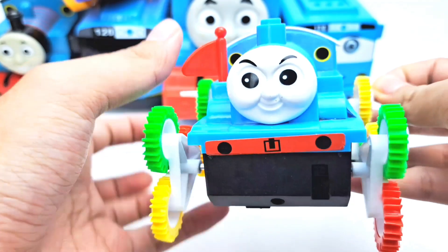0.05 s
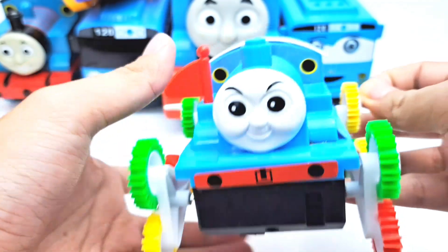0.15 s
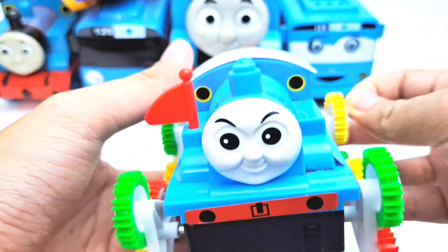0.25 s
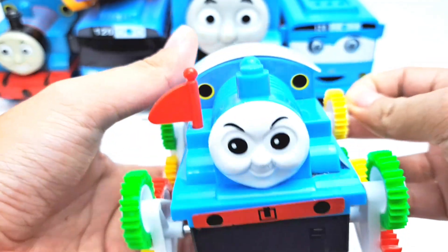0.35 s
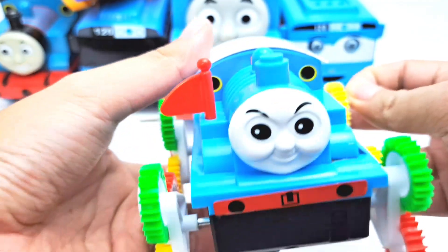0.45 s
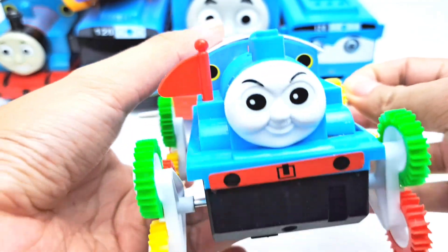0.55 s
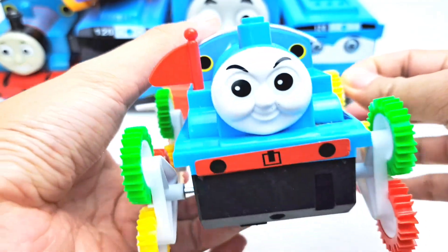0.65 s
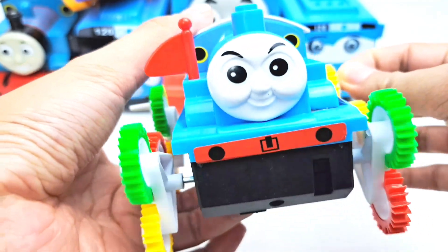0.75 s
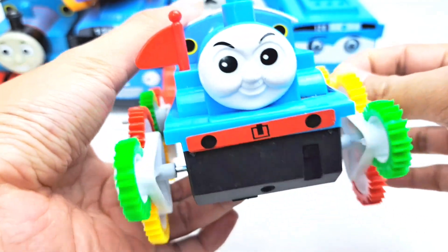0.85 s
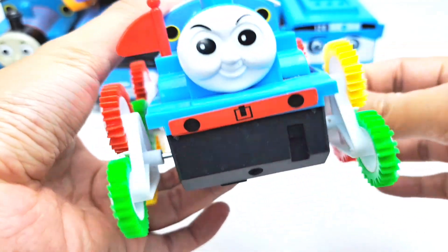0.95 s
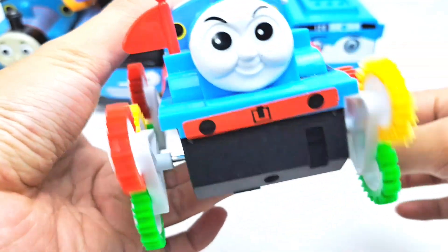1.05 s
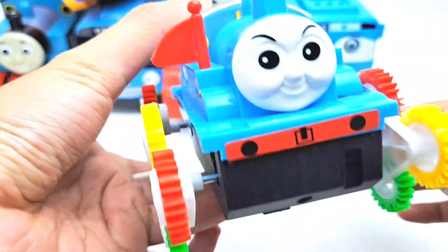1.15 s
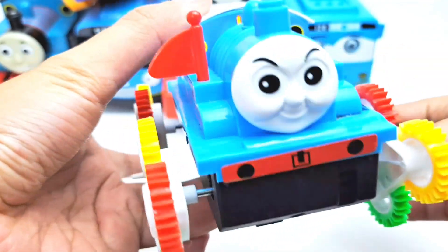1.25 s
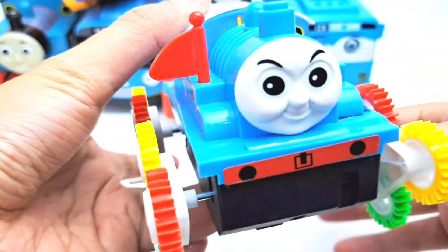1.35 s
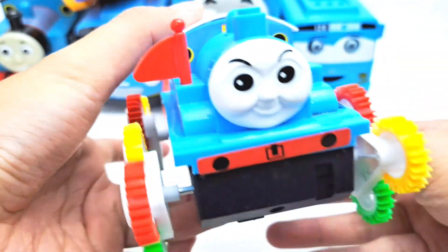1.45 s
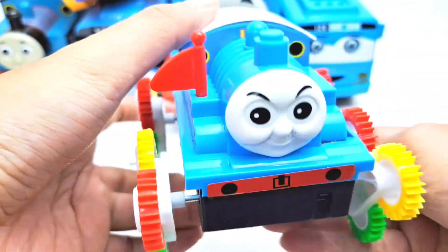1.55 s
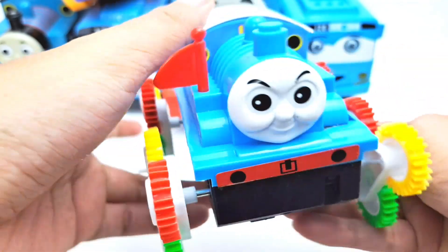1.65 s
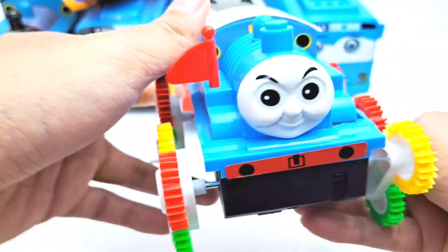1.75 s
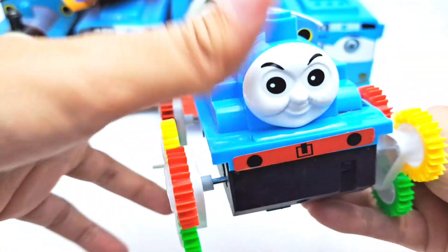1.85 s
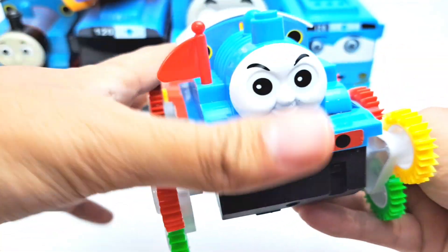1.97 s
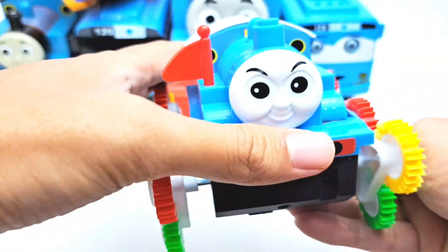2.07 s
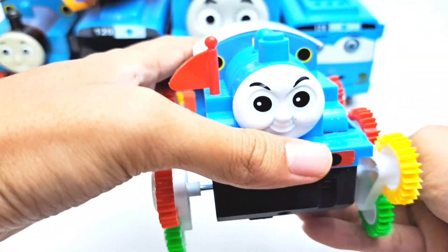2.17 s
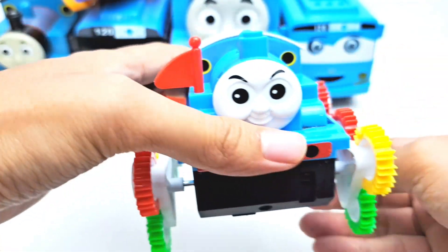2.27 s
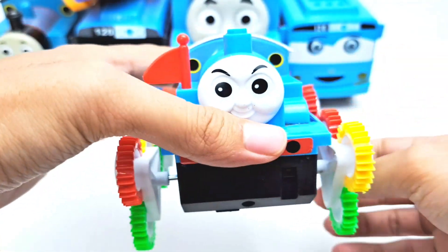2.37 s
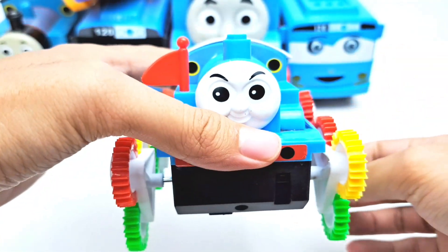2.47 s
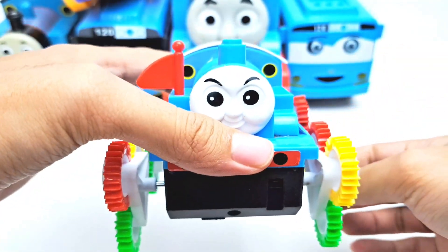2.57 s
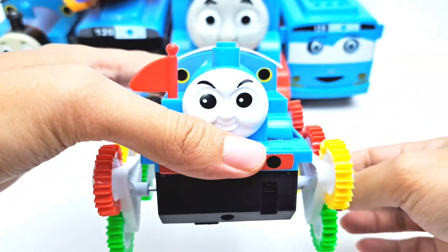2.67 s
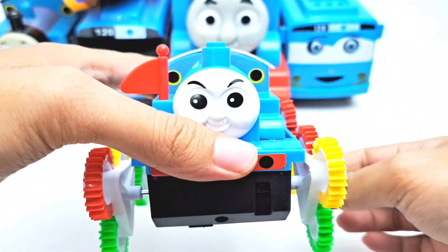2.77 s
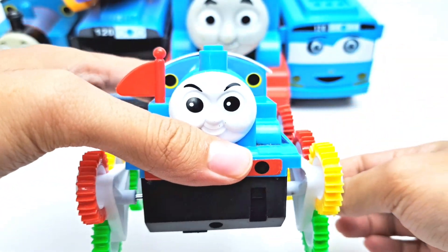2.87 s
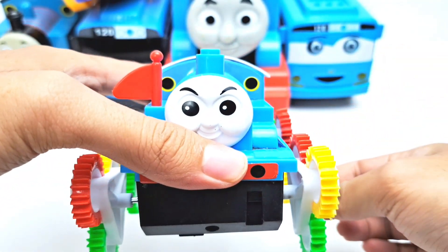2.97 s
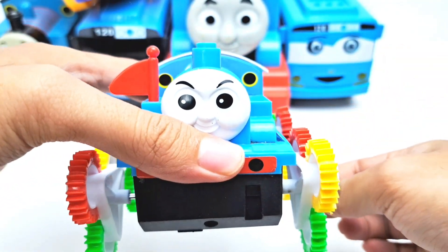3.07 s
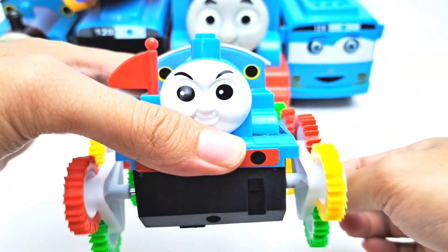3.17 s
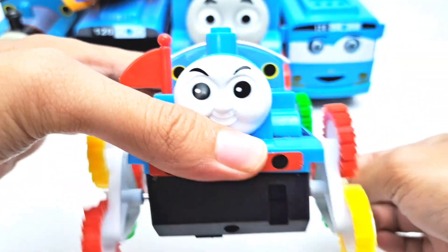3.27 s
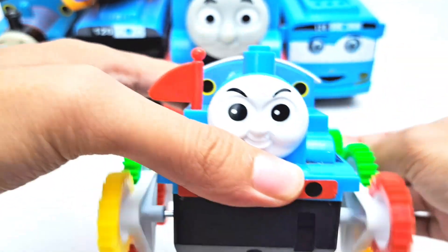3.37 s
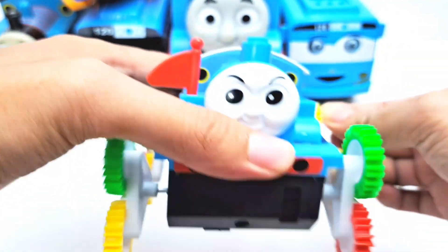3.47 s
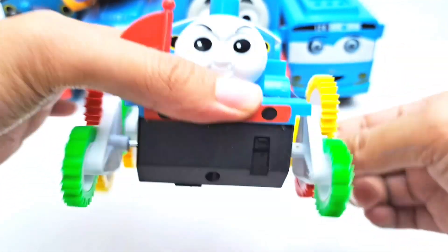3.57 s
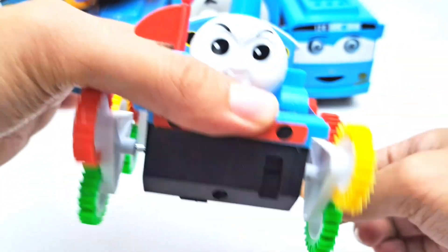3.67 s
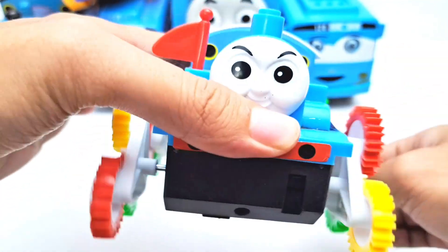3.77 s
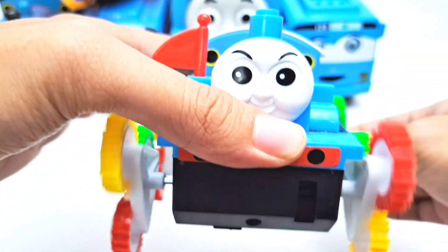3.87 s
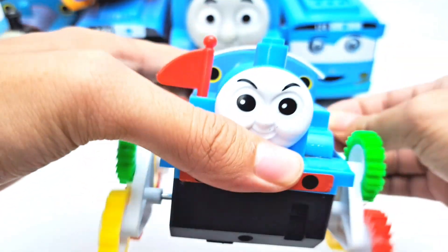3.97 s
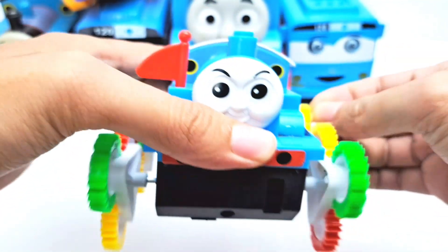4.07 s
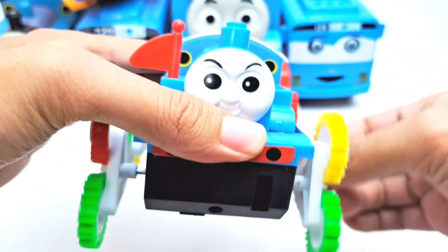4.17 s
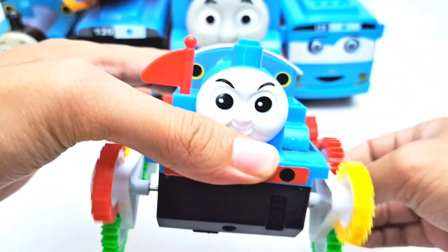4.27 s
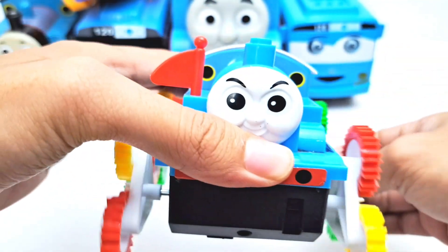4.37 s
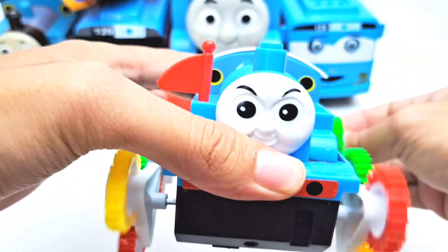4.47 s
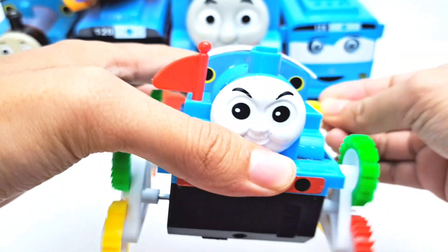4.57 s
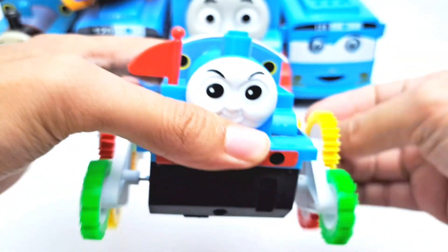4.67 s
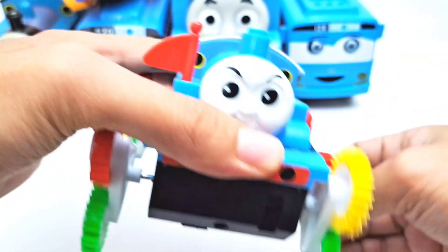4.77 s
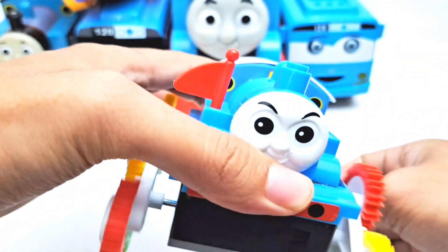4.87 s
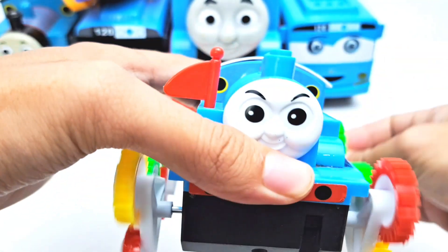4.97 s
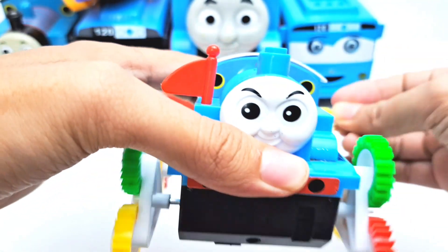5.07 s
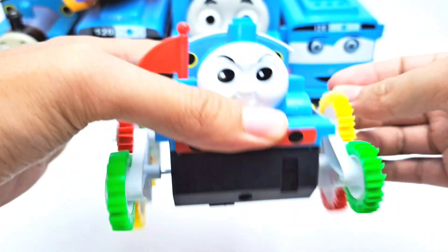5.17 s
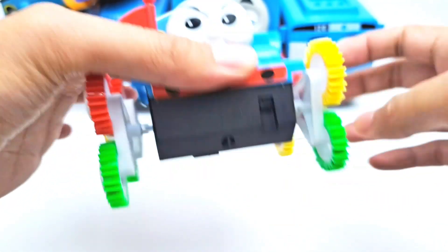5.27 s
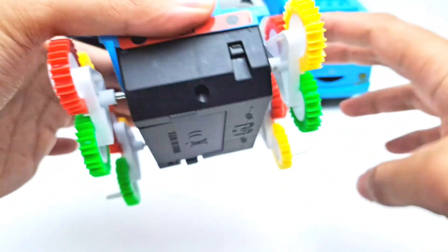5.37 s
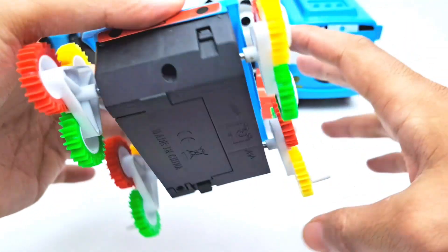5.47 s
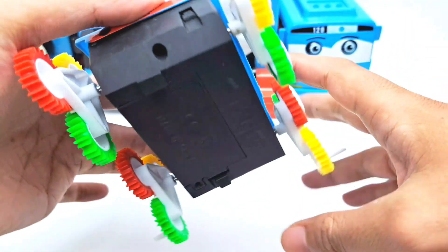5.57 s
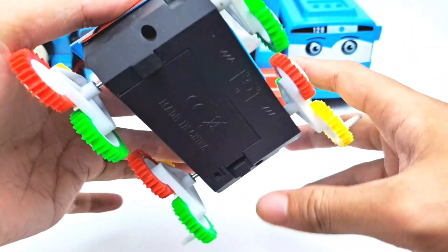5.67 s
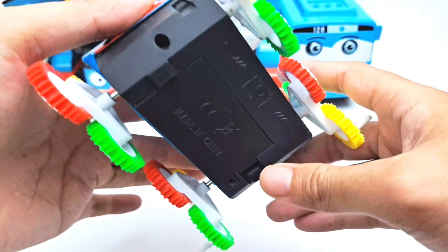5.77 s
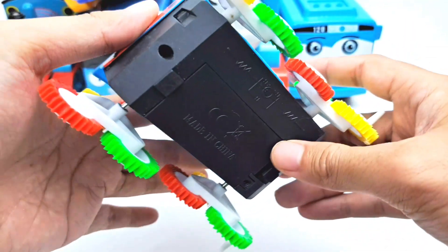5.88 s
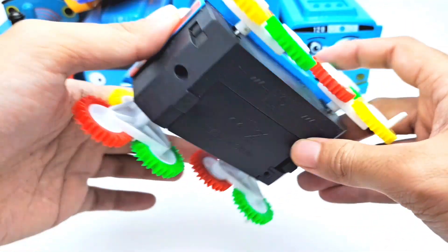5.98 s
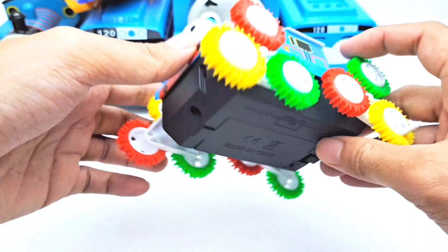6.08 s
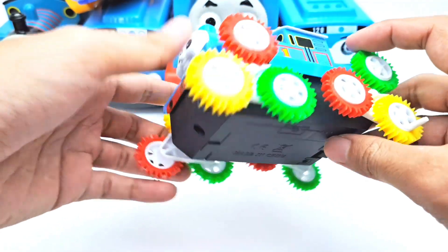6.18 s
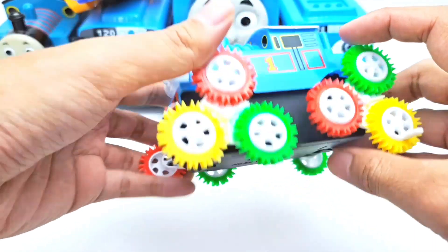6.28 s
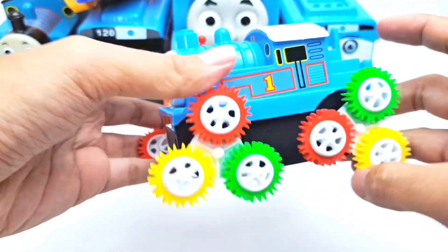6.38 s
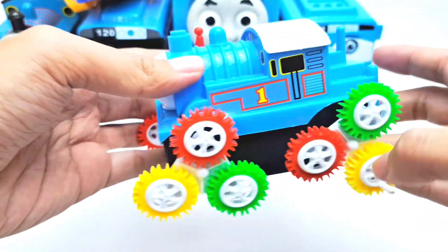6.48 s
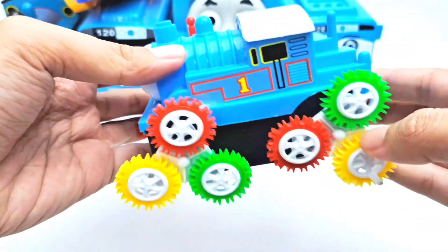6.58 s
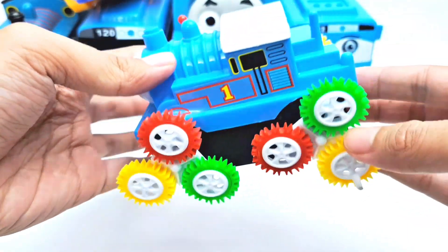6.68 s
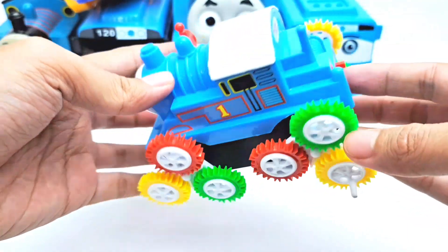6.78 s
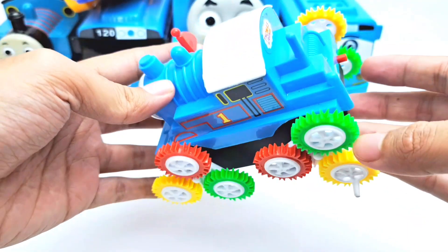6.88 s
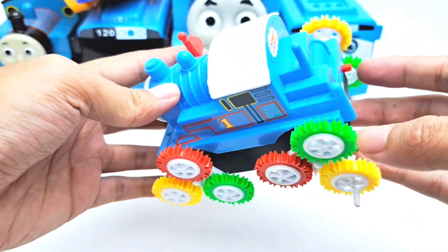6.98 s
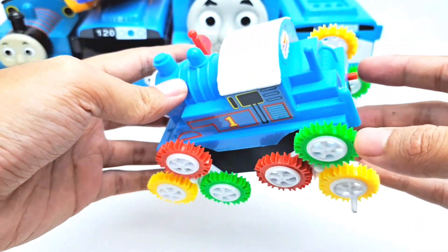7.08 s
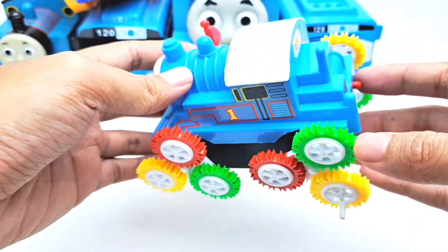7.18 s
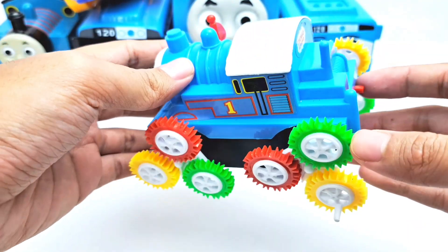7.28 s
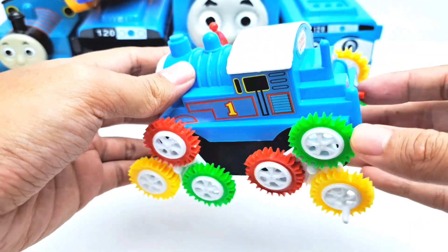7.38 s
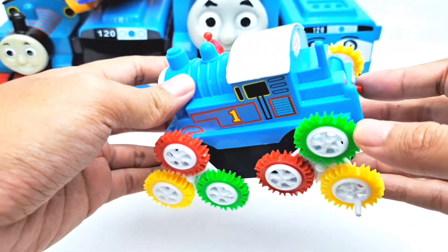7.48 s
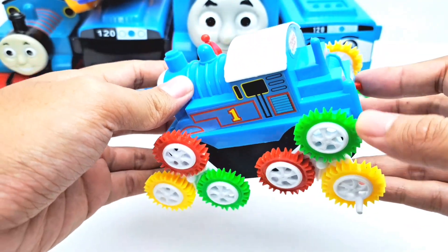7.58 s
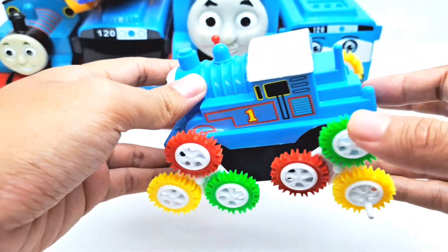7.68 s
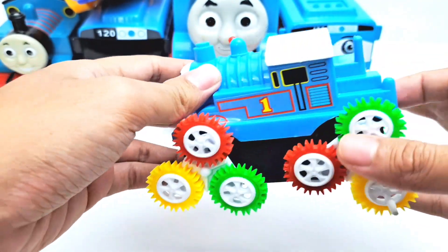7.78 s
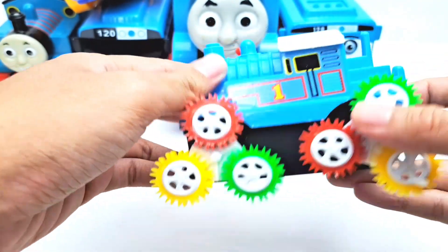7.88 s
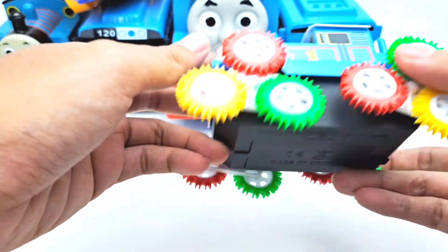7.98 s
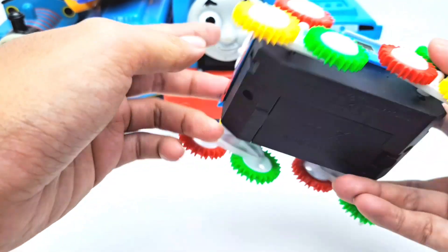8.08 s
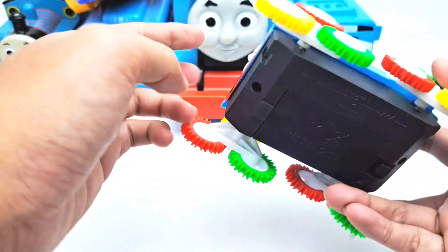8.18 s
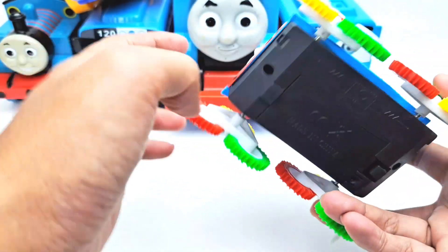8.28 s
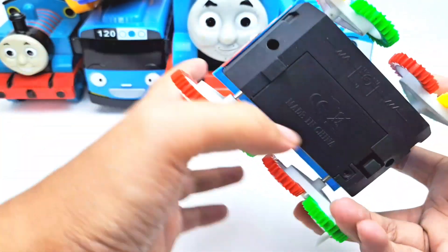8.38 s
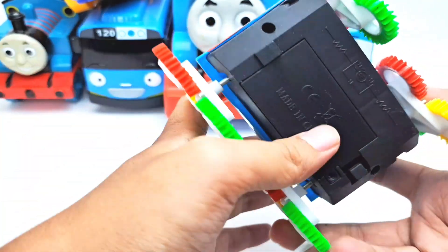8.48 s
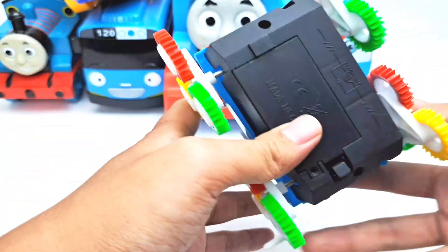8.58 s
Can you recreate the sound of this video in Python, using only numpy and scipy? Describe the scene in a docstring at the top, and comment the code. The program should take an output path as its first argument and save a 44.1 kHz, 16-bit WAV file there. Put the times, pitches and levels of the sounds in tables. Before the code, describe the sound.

Hands push the wheels of a hollow plastic toy train, its gears whirring up in rattly bursts, then plastic clicks and soft finger rubbing.

```python
"""A hard plastic toy train whirrs and rattles close by as hands push its wheel arms round. The wheels drive the
gearbox backwards: tooth taps at a rising and falling rate excite the hollow shell. Slack teeth knock and a dry
axle squeals; loose parts click and fingertips tap, as filtered bursts of contact noise. Fingers rub the plastic
in fine grains and one drag rasps. Below lie a low hum, soft air and a small room."""
import sys
import numpy as np
from scipy import signal
from scipy.fft import rfft, irfft, next_fast_len
from scipy.io import wavfile
from scipy.ndimage import uniform_filter1d

SR = 44100
rng = np.random.default_rng(int(sys.argv[2]) if len(sys.argv) > 2 else 0)


def file_out(sig):
    """Save sig as 16-bit WAV at sys.argv[1]."""
    # one column per channel
    cols = np.atleast_2d(sig).T
    # limit, then scale
    lim = np.clip(cols, -1, 1)
    pcm = np.round(lim * 32767).astype(np.int16)
    wavfile.write(sys.argv[1], SR, pcm)


N = 380891
TIME = np.arange(N) / SR
REFERENCE_HZ = 1000  # tooth rate or frequency that octaves and delays are counted from

# the hand pushes the wheel arms round: [fastest at t/s, run-up/s, run-down/s, top tooth rate f/Hz,
# run-up bend (1 = even), level/dB and treble lift/dB before the effects of speed and slack]
PUSHES = [(1.17, .44, .12, 1666, 1.05, -32, 7.6), (3.66, .49, 0.34, 1196, 2.14, -20, 2.9),
          (4.14, .6, .58, 1028, 1.38, -20, 4.9), (4.75, .85, .27, 1276, .8, -20.5, 3.5),
          (5.21, .42, 0.53, 1260, 1.9, -21, 2.5)]
# teeth knock across their play and set the gears rattling: [t/s, relative level/dB]
KNOCKS = [(0.877, -29), (1.013, -18.5), (1.079, -12), (1.13, -7.5), (1.184, -13.5), (3.296, -34.5),
          (3.349, -17), (3.389, -7.5), (3.883, -19.5), (3.931, -24), (4.059, -12), (4.204, -16.5),
          (4.246, -13), (4.274, -17), (4.34, -14.5), (4.384, -15), (4.399, -18), (4.439, -19),
          (4.483, -14.5), (4.532, -10.5), (4.771, -15), (4.834, -22), (4.948, -12.5), (4.985, -23.5),
          (5.311, -16.5), (5.355, -20), (5.474, -32), (5.554, -27.5)]


def gearbox():
    """A fast and a half-speed gear tap and rattle in the shell; a harder push is brighter."""
    # gear noise before and after the hand takes a new grip, one list each: [f/Hz, relative level/dB]
    grip_colours = [
        [(240, -68.5), (400, -20), (614, -19), (784, -3.5), (1200, -0.5), (1320, -3), (2190, -2.5), (2670, -8),
         (2880, -6.5), (6680, -17.5), (8670, -27.5), (12700, -28), (15500, -36.5)],
        [(180, -63), (300, -28), (696, -17), (953, -17.5), (1090, -8), (1180, -11), (1510, -2), (2000, -8),
         (2210, -4), (2790, -12.5), (4490, -10.5), (7500, -19.5), (9760, -28), (12900, -25), (15500, -39.5)],
    ]
    regrip_s = 2.2
    grip_shift, sway_db = 0.015, 1.6  # swing of resonance pitch (as a share) and of brightness

    speed = tooth_rate()
    tooth_hz = speed * (1 + .017 * walk(150))
    mesh = undb(-3) * teeth(tooth_hz, scatter_db=14)
    mesh += undb(-7) * teeth(tooth_hz / 2, scatter_db=5.5)
    # small gears radiate little bass; the top rolls off too
    mesh = colour(mesh, lambda hz: -10 * np.log10((1 + (1500 / hz) ** 4) * (1 + (hz / 4500) ** 2)))
    # the teeth sing while they are driven faster, and go slack as they coast
    coasting = uniform_filter1d(1. * (np.gradient(speed) <= 0), size=2000)
    mesh *= undb(-8 * coasting + 6.1 * walk(35))
    # loose parts rattle all over the toy, so each port hears them differently
    rattle = both([steady(grains(3.5 * tooth_hz, spread_db=0)) for _ in range(2)], alike_hz=3000)
    drive = disperse(mesh + rattle) * undb(4 * walk(90))  # the hand pushes unevenly

    gain, treble_db = effort(speed, coasting)
    jolts = sum(undb(db - 11) * swell(s, rise_s=0.024, fall_s=0.036) for s, db in KNOCKS)
    out = 0
    for held, points in zip((TIME < regrip_s, TIME >= regrip_s), grip_colours):
        def grip(k):
            return colour(drive, lambda hz: along(points, hz) + shell_db(hz * (1 - k * grip_shift))
                          + k * sway_db * np.tanh(4 * np.log(hz / 2000)))
        # the changing grip pulls the shell's resonances and its brightness a little up and down
        tight, slack = grip(1), grip(-1)
        ring = slack + (tight - slack) * (1 + np.tanh(2 * walk(14))) / 2
        treble = signal.sosfiltfilt(signal.butter(2, 3000, "high", fs=SR, output="sos"), ring)
        bright = undb(treble_db + walk(130))
        out = out + held * steady(ring + (bright - 1) * treble, span_s=0.017)
    return out * np.hypot(gain * undb(0.5 * walk(40)), jolts)


def tooth_rate():
    """Each push runs the gears up to a top speed; friction then slows them evenly; the fastest push leads."""
    speed = np.full(N, 100.)  # slowest tooth rate in Hz
    for s, up_s, down_s, top_hz, bend, _, _ in PUSHES:
        short_of_top = (np.maximum(s - TIME, 0) / up_s) ** bend + np.maximum(TIME - s, 0) / down_s
        speed = np.maximum(speed, top_hz * (1 - short_of_top))
    return speed


def teeth(tooth_hz, scatter_db, hardest=1.33):
    """One tap per tooth, each of its own strength, capped at `hardest` times the scatter."""
    turn = np.cumsum(tooth_hz) / SR
    at = np.flatnonzero(np.diff(np.floor(turn)))
    late = 1 - turn[at + 1] % 1 * SR / tooth_hz[at]
    size = undb(scatter_db * np.minimum(rng.standard_normal(N), hardest))[:len(at)]
    taps = np.zeros(N)
    for k in range(-3, 5):  # a short sinc sets each tap between two samples
        taps[np.clip(at + k, 0, N - 1)] += size * np.sinc(k - late)
    return steady(taps - uniform_filter1d(taps, size=256))


def effort(speed, coasting):
    """Gain and treble lift of the gears: both grow with octaves of speed and drop as the hand eases off."""
    speed_db, slack_db = 6, -3  # per octave; when coasting
    treble_speed_db, treble_slack_db = 6, -3
    bite_hz, bite_order = 540, 5  # below this tooth rate the gears slide almost silently
    s, *_, level_db, treble_db = np.transpose(PUSHES)
    octaves = np.log2(speed / REFERENCE_HZ)
    eased = np.interp(TIME + 0.024, TIME, coasting)  # the level drops just ahead of the speed
    level = np.interp(TIME, s, level_db) + speed_db * octaves + slack_db * eased
    gain = undb(level) / (1 + (bite_hz / speed) ** bite_order)
    treble = np.interp(TIME, s, treble_db) + treble_speed_db * np.minimum(octaves, .3)
    return gain, treble + treble_slack_db * eased


def disperse(x, spread_s=.004):
    """Bending waves cross the shell faster the higher they are, smearing every tap (delay at 1 kHz)."""
    size = next_fast_len(N + 4096, True)
    phase = 4 * np.pi * spread_s * np.sqrt(REFERENCE_HZ * bins(size))
    return irfft(rfft(x, size) * np.exp(-1j * phase), size)[..., :N]


def shell_db(hz):
    """The hollow shell lifts or dips the sound around each of its resonances."""
    # shell resonances: [f/Hz, width/Hz, lift/dB]
    resonances = [(710, 85, 7), (865, 63, 7.5), (1073, 51, 9.5), (1580, 100, 2.5), (1730, 28, -0.5),
                  (1776, 21, 7.5), (1853, 120, 6), (2249, 100, 11.5), (2557, 37, 3.5), (2690, 29, 4.5),
                  (3175, 80, -2), (3440, 85, 14), (3450, 110, -15), (4313, 140, 7), (4430, 58, -2),
                  (4750, 58, 6), (5000, 70, -5), (5400, 41, -8), (5770, 43, -9), (7760, 150, -5),
                  (7640, 1100, 5.5)]
    return sum(db / (1 + (2 * (hz - f) / width) ** 2) for f, width, db in resonances)


def knocks():
    """Slack teeth knock; the faster the gears run, the tighter they sit and the softer they knock."""
    knock_db, tight_db = -20.5, -17  # trim; change per octave of speed
    octaves = np.log2(np.maximum(tooth_rate(), 700) / REFERENCE_HZ)
    return place(click(s, db + knock_db + tight_db * octaves[int(s * SR)], ring_hz=1900,
                       t60=0.046, treble_db=-4.5, graze_db=-25.5) for s, db in KNOCKS)


def axle():
    """A dry axle sticks and slips in its bearing: a rough, wavering squeal."""
    # squeals: [loudest at t/s, rise/s, fall/s, pitch f/Hz, glide/(octaves/s), level/dB before trim]
    squeals = [(3.727, .05, .03, 1830, -1.6, -19), (4.68, .025, 0.031, 2265, 1.43, -10.5),
               (5.25, .03, 0.37, 1845, 0.29, -20)]
    squeal_db, stall_hz = -2, 400  # trim; tooth rate below which it fades
    out, wobble = 0, 1 + .018 * walk(300)
    for s, rise_s, fall_s, hz, slide, db in squeals:
        tone = np.sin(2 * np.pi * np.cumsum(glide(s, hz, slide) * wobble) / SR)
        out = out + undb(db) * swell(s, rise_s, fall_s) * tone
    turning = 1 / (1 + (stall_hz / tooth_rate()) ** 6)  # it fades away as the wheels slow
    return out * turning * undb(squeal_db + 3.9 * walk(120))


def ports(x):
    """The gearbox leans by pitch towards either of two mic ports; above the bass they are out of step."""
    # how much louder the left port is than the right: [f/Hz, level/dB]
    left_lead = [(60, 1), (110, 1.5), (200, 4.5), (380, -2), (700, 0), (1290, -4.0), (2380, -2), (4400, -5),
                 (8120, -1.5), (15000, 1)]
    turn_rad, turn_hz = 1.72, 650
    size = next_fast_len(N + 2048, True)
    hz = bins(size)
    lean = undb(along(left_lead, hz) / 2)
    phase = turn_rad * (1 - np.exp(-hz / turn_hz))
    return irfft(rfft(x, size) * np.array([lean, np.exp(-1j * phase) / lean]), size)[:, :N]


def clicks():
    """Loose wheels and panels snap against their stops, and fingertips tap the shell; each click has its own
    ring and treble, the taps being the dullest."""
    # plastic clicks: [t/s, level/dB before trim, ring f/Hz, treble tilt/dB before the edge lift]
    snaps = [(.037, -36, 1910, -5), (0.059, -35, 1070, -30), (.096, -41, 1600, -17), (.134, -25, 1600, -14),
             (.195, -30, 1910, -15), (0.468, -37, 1070, -24), (.55, -39.5, 1900, -15),
             (1.279, -36, 867, -55), (1.362, -35.5, 2300, -13.5), (1.409, -34.5, 1370, -10.5),
             (1.517, -43.5, 1230, -10), (1.552, -33, 1080, -16.5), (1.596, -31.5, 1910, -13.5),
             (1.709, -29, 2340, -11), (1.754, -37.5, 1830, -21), (1.858, -34, 2410, -10),
             (1.929, -31.5, 1390, -7), (2.093, -40.5, 2250, -10), (2.26, -42.5, 1600, -8.5),
             (2.388, -25.5, 890, -19), (2.68, -58, 2300, -10), (2.819, -51, 1960, -14),
             (3.128, -36, 2337, -11.5), (5.721, -36.5, 1890, -16), (5.788, -39, 1130, -39),
             (5.952, -44, 1140, -35), (5.999, -35.5, 1080, -39), (6.235, -27, 715, -21),
             (6.357, -37.5, 1650, -15), (6.387, -35.5, 715, -15), (6.514, -32.5, 615, -31),
             (6.564, -35.5, 1710, -17), (6.617, -41, 1150, -28), (6.647, -29.5, 1710, -11.5),
             (6.688, -24, 1590, -9.5), (6.704, -29, 1080, -12.5), (6.779, -39.5, 656, -17),
             (6.893, -41.5, 1083, -16), (7.018, -46, 890, -54), (7.097, -40, 1080, -11),
             (7.199, -32, 1180, -10), (7.274, -39.5, 868, -15.5), (7.466, -39, 1150, -37),
             (7.542, -38, 1140, -43), (7.691, -43.5, 696, -48), (7.756, -39, 700, -34),
             (7.769, -33.5, 2450, -9), (7.798, -30, 1110, -22), (7.818, -24.5, 2150, -12),
             (7.855, -29.5, 1060, -10), (7.892, -30.5, 1730, -12), (7.909, -27.5, 1090, -25),
             (7.974, -21, 1270, -13), (8.008, -30.5, 710, -15.5), (8.081, -38.5, 1060, -10),
             (8.166, -38.5, 2290, -10), (8.299, -37.5, 1290, -29), (8.518, -47.5, 1250, -32),
             (8.561, -33, 1130, -3)]
    click_db = -7  # trim
    return place(click(s, db + click_db, hz, t60=0.055, treble_db=treble_db, graze_db=-17)
                 for s, db, hz, treble_db in snaps)


def click(s, peak_db, ring_hz, t60, treble_db, graze_db):
    """A part grazes, snaps home and chatters; it rings at its own pitch as well as the shell's."""
    # a struck wheel or panel: [f/Hz, relative level/dB]
    struck = [(200, -32), (450, -16), (680, -1.5), (900, -11.5), (1150, 2.5), (1500, -6.5), (2300, -3.5),
              (3400, -9.5), (4600, -3), (6500, -11), (9500, -19), (13000, -21.5), (15500, -21)]
    graze_s, crack_s, snap = 0.018, 0.0059, 2.1
    ring_db, ring_width, edge_db = 6, 0.21, 10.5  # width in log frequency
    shell_share, spot_db = 0.29, 3.5

    lead = SR // 50  # samples of grazing ahead of the snap
    t = TIME[:SR // 6] - lead / SR
    graze = undb(graze_db) * np.exp(np.minimum(t, 0) / graze_s)
    chatter = np.exp(-np.log(1000) * np.abs(t) / t60)
    push = both(rng.standard_normal((2, len(t))), alike_hz=700) * np.where(t < 0, graze, chatter)
    # the chatter is dull; the bright crack lasts only a few milliseconds
    push = colour(push, lambda hz: -10 * np.log10(1 + (hz / 4500) ** 2))
    push += rng.standard_normal((2, len(t))) * (t >= 0) * np.exp(-np.abs(t) / crack_s)
    push[:, lead] += snap
    # every spot on the toy favours different overtones
    spot = np.c_[np.geomspace(500, 16000, 60), spot_db * rng.standard_normal(60)]
    ring = colour(push, lambda hz: along(struck, hz) + shell_share * shell_db(hz) + along(spot, hz)
                  + ring_db / (1 + (np.log(hz / ring_hz) / ring_width) ** 2)
                  + (treble_db + edge_db) * np.clip(np.log2(hz / 2300) / 0.96, 0, 1.8))
    crest = np.sqrt(np.max(uniform_filter1d(np.mean(ring ** 2, axis=0), size=200)))  # short-term rms
    return s - lead / SR, ring * undb(peak_db) / crest


def fingers():
    """Skin slides on the plastic in fine grains and catches on its ridges."""
    # fingers slide on the shell: [firmest at t/s, rise/s, fall/s, level/dB before trim, bass lift/dB]
    rubs = [(.01, 0.074, 0.17, -45, 3), (.17, 0.11, 0.059, -45, -2), (.53, 0.26, 0.27, -61, -2),
            (1.68, 0.21, 0.15, -44.5, -22), (1.92, .03, 0.057, -46, -4), (2.25, 0.23, 0.13, -55, 2),
            (2.385, .03, 0.062, -47.5, -6), (3.26, 0.12, 0.041, -46.5, -16), (5.64, 0.13, 0.048, -52, -7),
            (6.03, 0.065, 0.15, -52.5, -5), (6.235, 0.14, 0.043, -52.5, -7), (6.42, 0.18, 0.08, -47.5, -1),
            (6.55, 0.14, 0.054, -47, 0), (6.73, 0.11, 0.14, -46.5, 0), (6.91, 0.077, 0.067, -53, 0),
            (7.22, 0.23, 0.14, -57.5, -5), (7.48, 0.18, 0.18, -54.5, 6), (7.81, 0.072, 0.059, -42.5, 8),
            (7.96, 0.1, 0.15, -46.5, -6), (8.17, .1, 0.32, -59, 6), (8.545, 0.052, 0.15, -52, 3),
            (8.62, 0.39, 0.17, -63, -1)]
    # skin on plastic: [f/Hz, relative level/dB]
    skin = [(240, -22), (450, 0.5), (700, -2.5), (1100, -0.5), (2200, -6), (3300, -15.5), (5000, -13),
            (9000, -25.5), (13000, -26), (15500, -41)]
    rub_db, catch_db = -1, 1  # trim; catches against slips

    slips = unit(both([grains(900, spread_db=-2.5) for _ in range(2)], alike_hz=700))
    slips = slips * undb(3.4 * walk(51))
    catches = signal.lfilter([1], [1, -.99], np.abs(grains(45, spread_db=3)))  # each dies away in ms
    scrape = catches * both(rng.standard_normal((2, N)), alike_hz=703)
    slips = slips + undb(catch_db) * unit(scrape)
    rub = colour(slips, lambda hz: along(skin, hz) + 0.9 * shell_db(hz))
    # the grip changes how much bass comes out
    s, *_, bass_db = np.transpose(rubs)
    bass = signal.sosfiltfilt(signal.butter(2, 1200, fs=SR, output="sos"), rub)
    rub = steady(rub + (undb(np.interp(TIME, s, bass_db)) - 1) * bass, span_s=0.06)
    power = sum((undb(db) * swell(s, rise_s, fall_s)) ** 2 for s, rise_s, fall_s, db, _ in rubs)
    return rub * np.sqrt(power) * undb(rub_db)


def drag():
    """A fingertip sticks and slips along a panel: a short rasp whose slip rate falls."""
    at_s, rise_s, fall_s, level_db = 7.27, 0.14, 0.072, -49
    slip_hz = glide(at_s, hz=803, octaves_per_s=-6) * np.exp(.15 * walk(610))
    rasp = teeth(slip_hz, scatter_db=7)
    rasp = steady(colour(rasp, lambda hz: -20 * np.log10(1 + (np.log(hz / 850) / 0.3) ** 2)))
    return rasp * swell(at_s, rise_s, fall_s) * undb(level_db)


def room_tone():
    """Wavering, beating hum lines over a soft rumble and hiss; the bass is alike at both ports."""
    # hum lines: [f/Hz, rms level/dB before trim and swell]
    hum_lines = [(48.4, -53.5), (73.5, -60), (76.8, -53.5), (96.9, -54.5), (145.3, -66.5), (199.2, -66)]
    # slow swell of the hum: [t/s, level/dB before trim]
    hum_swell = [(0, -1), (1.2, 2.5), (2.7, -4), (3.3, 1.5), (4.8, 1.5), (5.9, -8.5), (6.6, 0), (8.6, 0)]
    # room noise: [f/Hz, relative level/dB]
    air = [(18, -38.5), (30, -29), (55, -6), (85, -7.5), (130, -12), (200, -18.5), (270, -24.5),
           (370, -22.5), (440, -33.5), (750, -33.5), (1300, -46), (2200, -58.5), (3500, -60), (9500, -62.5),
           (13000, -59), (15500, -72)]
    air_db, hum_db, wide_hz = -49.5, 1, 450  # rms of the shared noise; hum trim; stereo above this
    hum = 0
    for hz, db in hum_lines:
        wavering_hz = hz + .9 * walk(4)
        hum = hum + undb(db) * np.sqrt(2) * np.sin(2 * np.pi * np.cumsum(wavering_hz) / SR)
    hum = hum * undb(hum_db + np.interp(TIME, *np.transpose(hum_swell)))
    mid, side = colour(rng.standard_normal((2, N)), lambda hz: along(air, hz))
    side = colour(side, lambda hz: -10 * np.log10(1 + (wide_hz / hz) ** 2))
    return hum + undb(air_db) * (mid + side * np.array([[1], [-1]])) / np.std(mid)


def room(x, t60=0.22, wet_db=-11):
    """A short tail of reflections, different at each port."""
    t = TIME[:SR // 2]
    tail = rng.standard_normal((2, len(t))) * undb(-60 * t / t60) * (t > .003)
    tail /= np.sqrt(np.sum(tail ** 2, axis=1, keepdims=True))
    return x + undb(wet_db) * signal.fftconvolve(x, tail, axes=1)[:, :N]


def undb(db):
    """Decibels to gain."""
    return 10 ** (np.asarray(db) / 20)


def unit(x):
    """Scale to rms 1."""
    return x / np.sqrt(np.mean(x ** 2) + 1e-20)


def bins(size):
    """Frequencies in Hz of a spectrum of this many samples, floored at 1."""
    return np.maximum(np.arange(size // 2 + 1) * SR / size, 1)


def along(points, hz):
    """Read (Hz, value) points on a log-frequency axis."""
    f, value = np.transpose(points)
    return np.interp(np.log(hz), np.log(f), value)


def colour(x, db_at):
    """Causal minimum-phase filter whose gain in dB is a function of frequency."""
    size = 2 * next_fast_len(x.shape[-1] // 2 + 1024)
    cepstrum = irfft(np.log(undb(db_at(bins(size)))))
    cepstrum[1:size // 2] *= 2
    cepstrum[size // 2 + 1:] = 0
    return irfft(rfft(x, size) * np.exp(rfft(cepstrum)))[..., :x.shape[-1]]


def walk(rate):
    """Smooth random drift with a spread of 1 and `rate` new values per second."""
    steps = rng.standard_normal(8192)
    return unit(np.interp(TIME * rate, np.arange(len(steps)), steps))


def steady(x, span_s=0.048):
    """Even out the slow level and keep the grain."""
    power = np.maximum(uniform_filter1d(x ** 2, int(span_s * SR)), 0)
    return x / np.sqrt(power + 1e-6 * np.mean(x ** 2))


def swell(s, rise_s, fall_s):
    """Gain that climbs 20 dB in every rise_s to its peak at s, then sinks 20 dB in every fall_s."""
    return undb(-20 * np.clip(np.maximum((s - TIME) / rise_s, (TIME - s) / fall_s), 0, 10))


def glide(s, hz, octaves_per_s):
    """Pitch that slides evenly through hz at time s, up to an octave either way."""
    return hz * 2 ** np.clip(octaves_per_s * (TIME - s), -1, 1)


def grains(rate, spread_db):
    """Tiny impacts at random moments, of random sign and with sizes spread by spread_db."""
    hits = rng.random(N) < rate / SR
    return hits * rng.choice([-1, 1], N) * undb(spread_db * rng.standard_normal(N))


def both(x, alike_hz):
    """Two unrelated signals blended into a pair: alike in the bass, apart in the treble."""
    mid, side = x
    side = colour(side, lambda hz: -10 * np.log10(1 + alike_hz / hz))
    return (mid + side * np.array([[1], [-1]])) / np.sqrt(2)


def place(sounds):
    """Lay (start s, stereo sound) pairs on the time line."""
    out = np.zeros((2, N + SR))
    for s, sound in sounds:
        start = max(int(s * SR), 0)
        out[:, start:start + sound.shape[1]] += sound
    return out[:, :N]


def scene():
    """Gears, clicks and rubbing in a small humming room."""
    train = ports(gearbox() + axle() + knocks())
    hands = clicks() + fingers() + drag()
    return room(train + hands) + room_tone()


def record(dry):
    """The recorder rounds the highest peaks and cuts the very top."""
    rounded = .8 * np.tanh(dry / .8)
    top_cut = signal.ellip(10, .2, 80, 15700, fs=SR, output="sos")
    return signal.sosfilt(top_cut, rounded)


dry = scene()
out = record(dry)
file_out(out)
```